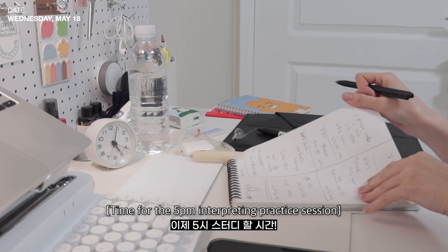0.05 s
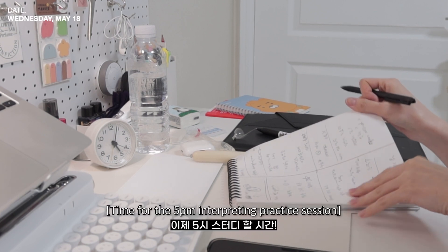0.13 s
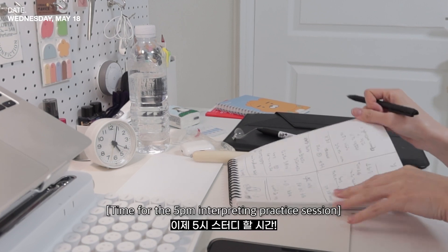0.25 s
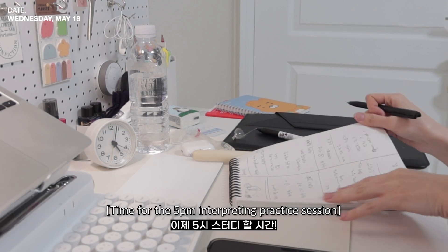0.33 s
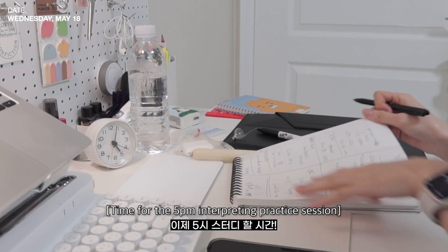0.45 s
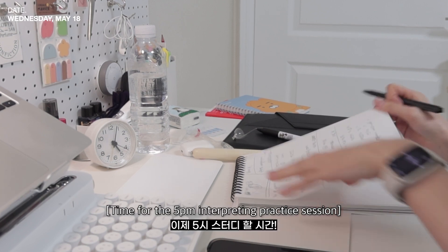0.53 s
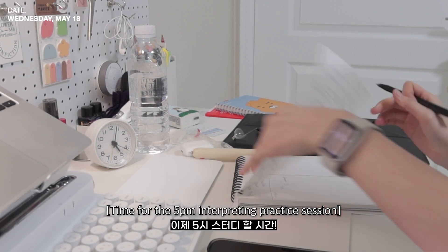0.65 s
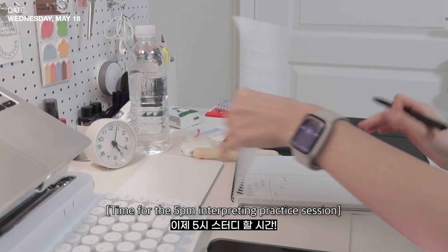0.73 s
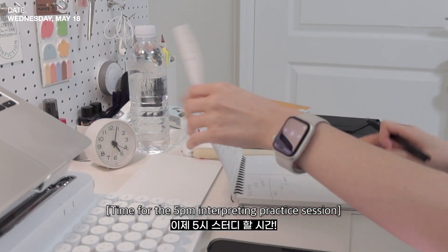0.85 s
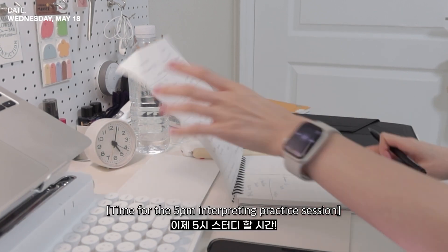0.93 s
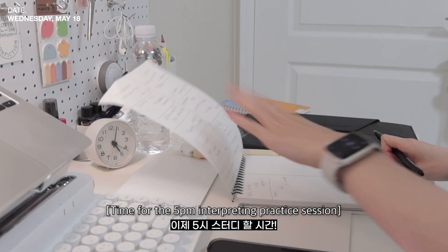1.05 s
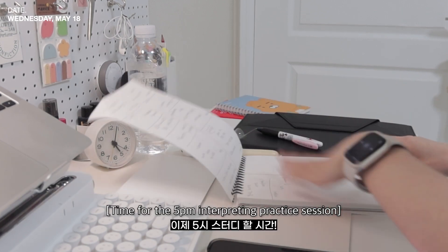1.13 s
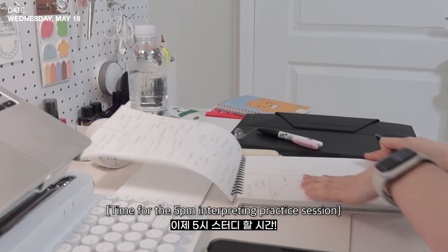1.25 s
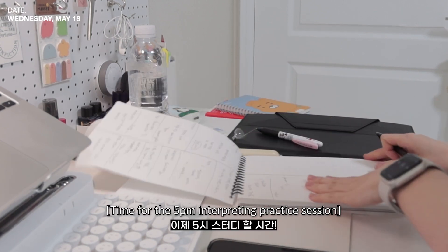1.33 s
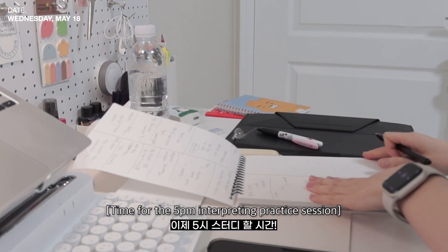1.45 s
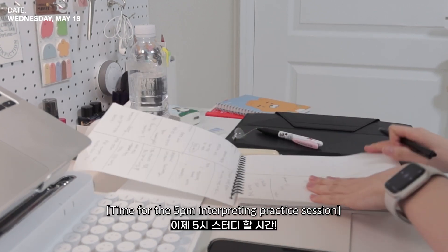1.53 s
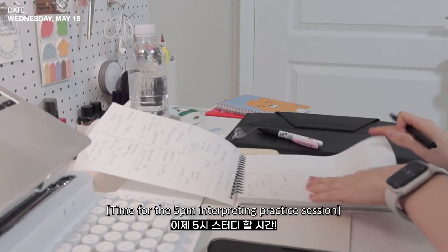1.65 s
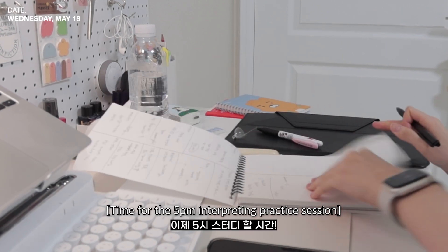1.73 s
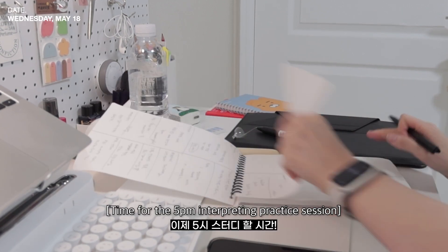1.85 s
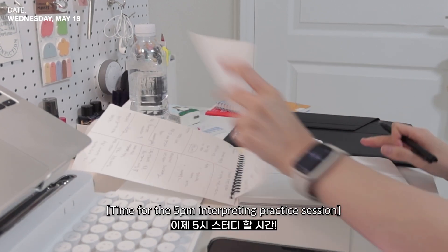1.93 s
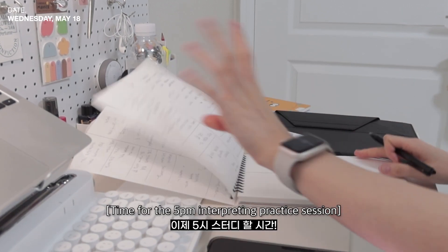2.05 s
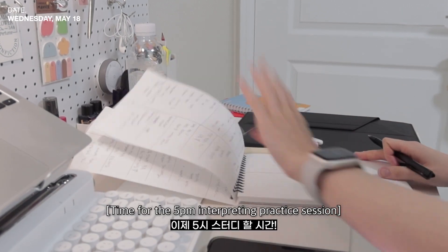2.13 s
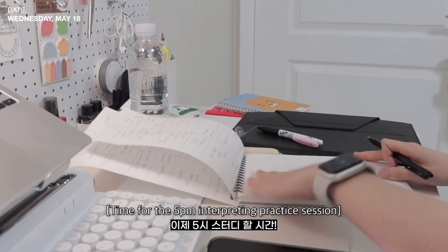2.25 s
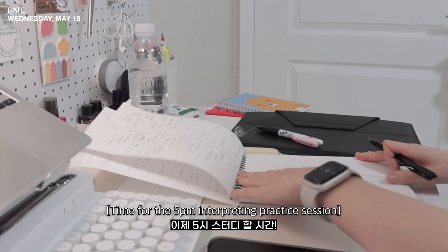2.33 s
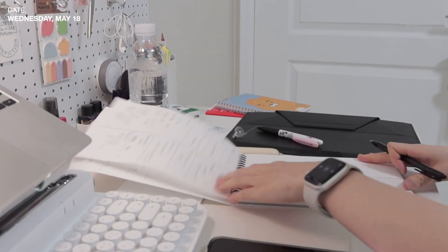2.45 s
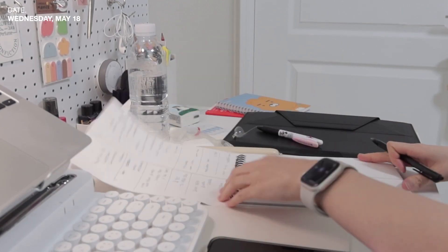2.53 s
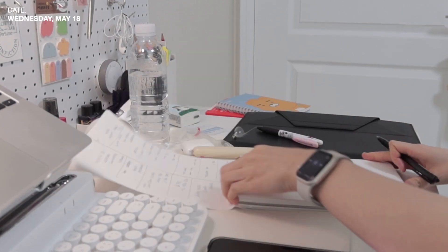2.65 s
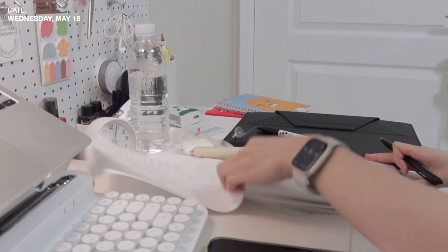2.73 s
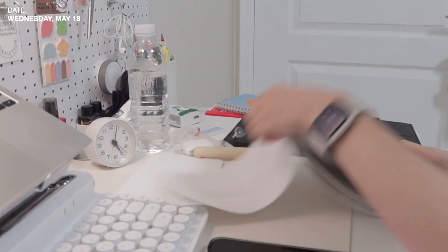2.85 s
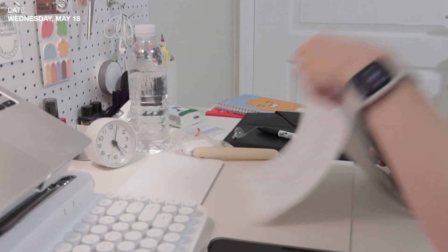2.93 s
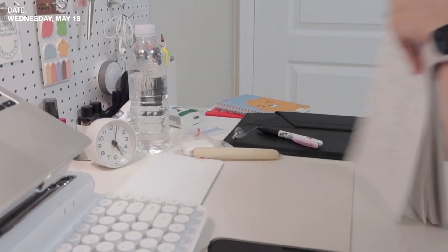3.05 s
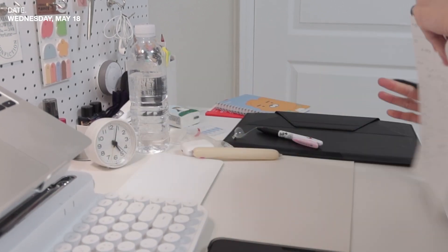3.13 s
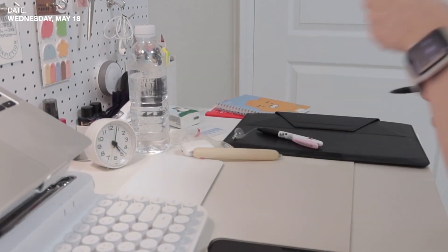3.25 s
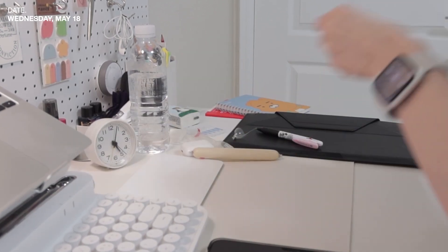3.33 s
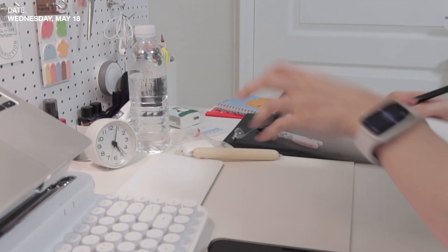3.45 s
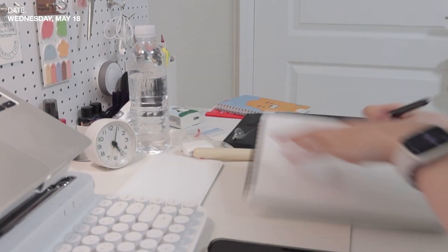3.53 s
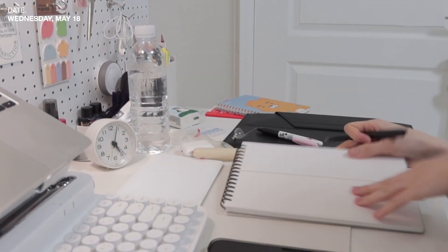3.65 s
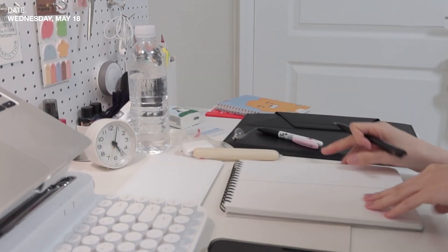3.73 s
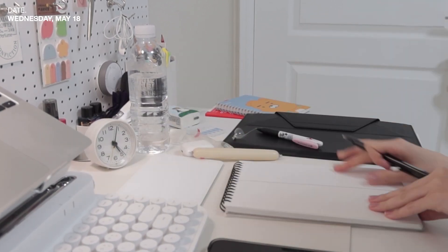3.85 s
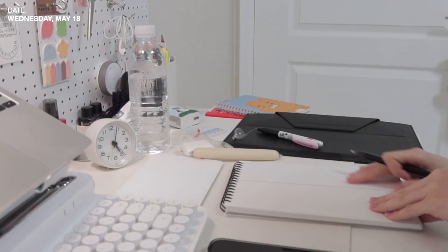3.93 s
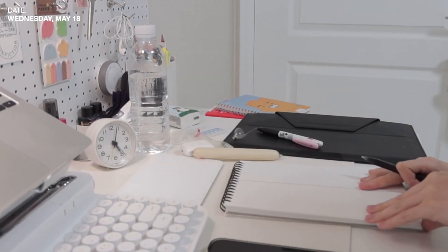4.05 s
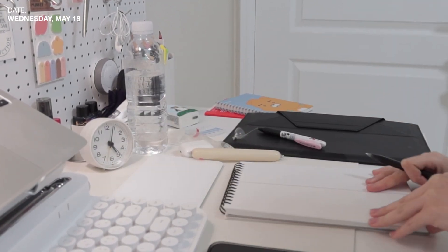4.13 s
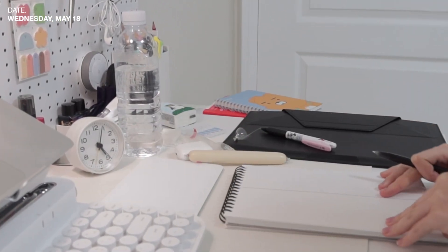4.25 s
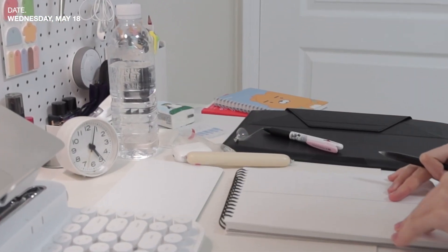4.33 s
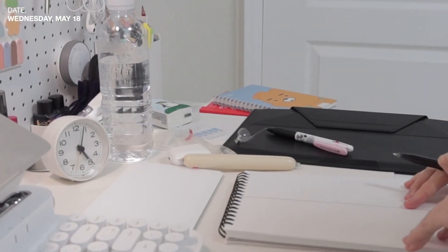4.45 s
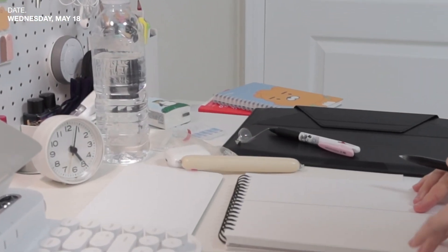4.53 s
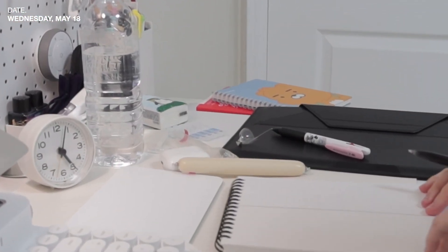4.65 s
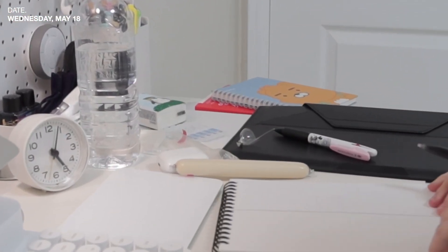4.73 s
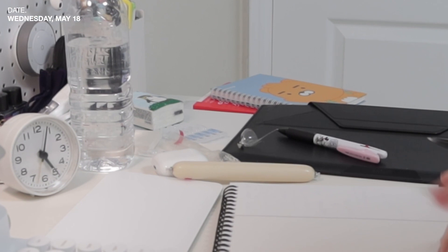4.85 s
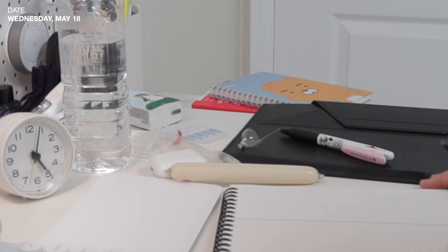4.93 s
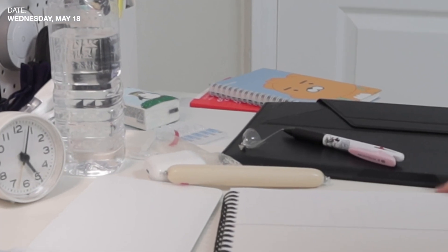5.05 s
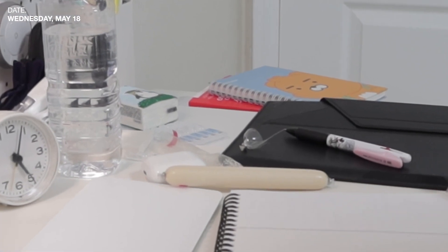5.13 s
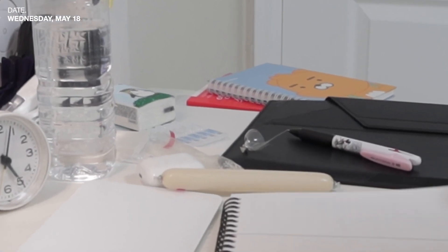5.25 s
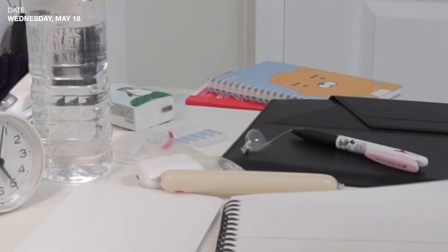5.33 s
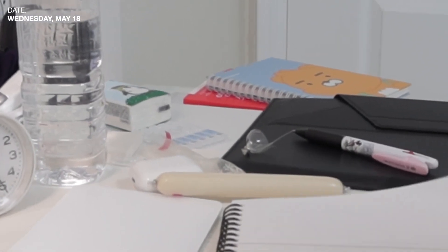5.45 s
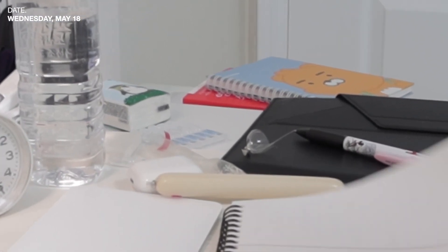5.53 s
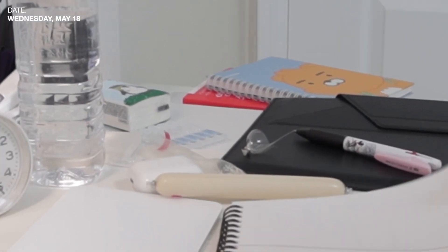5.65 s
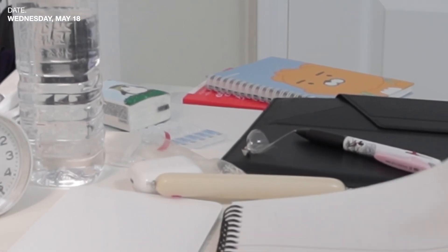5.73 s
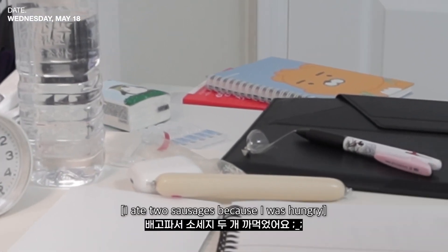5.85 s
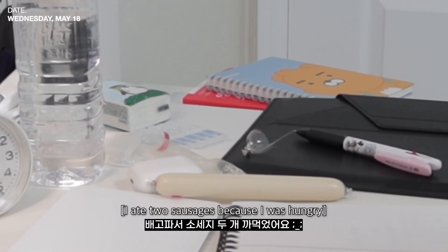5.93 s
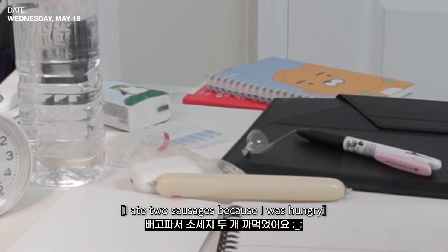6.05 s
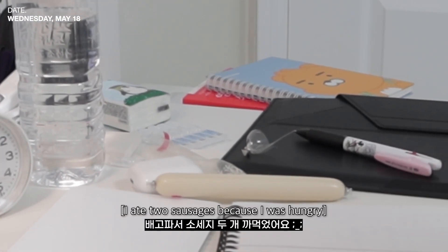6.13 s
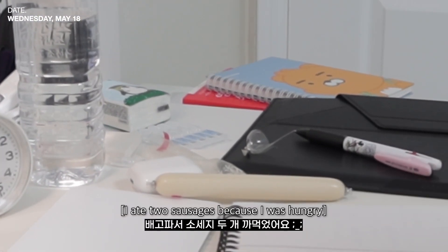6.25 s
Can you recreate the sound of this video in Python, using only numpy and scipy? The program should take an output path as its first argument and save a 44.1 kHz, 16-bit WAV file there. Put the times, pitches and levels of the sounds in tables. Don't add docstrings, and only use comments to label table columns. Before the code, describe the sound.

Close-miked paper on a desk indoors. Soft finger slides and small ticks come first, then a page flap, a quiet pause, and a much louder crisp crack. Busy rustling and wire ticks follow until about three seconds. The notebook lands with a single solid knock and low boom, followed by sparse creaks, gentle brushing and faint rustle over steady room hiss and low hum.

```python
import sys
import numpy as np
from scipy import signal
from scipy.fft import rfft, irfft, next_fast_len
from scipy.io import wavfile
from scipy.ndimage import uniform_filter1d, map_coordinates

SR = 44100
rng = np.random.default_rng(int(sys.argv[2]) if len(sys.argv) > 2 else 0)


def digitize_waveform(pressure):
    field = np.atleast_2d(pressure).T
    bounded = np.clip(field, -1, 1)
    quanta = np.round(bounded * 32767).astype(np.int16)
    wavfile.write(sys.argv[1], SR, quanta)


def undo_db(level):
    steps = np.asarray(level, float) / 20
    return 10 ** steps


N = 277429
TIME = np.arange(N) / SR


def unit(x):
    return x / np.sqrt(np.mean(x ** 2) + 1e-20)


def peak(x):
    return x / np.abs(x).max()


def along(points, hz):
    f, v = np.transpose(points)
    return np.interp(np.log(hz + 1), np.log(f + 1), v)


def wobble(rate):
    knots = rng.standard_normal(int(N * rate / SR) + 4)
    return map_coordinates(knots, [TIME * rate])


def coloured(x, spectrum):
    m = next_fast_len(len(x) + 8192)
    gain = undo_db(along(spectrum, np.fft.rfftfreq(m, 1 / SR)))
    return unit(irfft(rfft(x, m) * gain, m)[:len(x)])


def patchy(depth_db):
    z = signal.stft(rng.standard_normal(N), nperseg=256)[2]
    field = uniform_filter1d(rng.standard_normal(z.shape), 5, 0)
    field = unit(uniform_filter1d(field, 9, 1))
    return unit(signal.istft(z * undo_db(depth_db * field), nperseg=256)[1][:N])


def ringing(hz, db, q, size, strike=0):
    sheet = signal.iirpeak(hz, q + 0.034 * max(-25 - db, 0), SR)
    push = rng.standard_normal(size)
    push[0] += strike * np.sqrt(SR / hz)
    return unit(signal.lfilter(*sheet, signal.lfilter(*sheet, push)))


# (frequency [Hz], level [dB per Hz])
AIR_SPECTRUM = [(13, -50.5), (22, 5.5), (70, 0.5), (124, 4.5), (203, 0), (451, -10.5), (517, 3), (593, -24),
                (739, -6), (1510, -13.5), (1780, -24.5), (5630, -21), (7410, -16.5), (15600, -22.5)]


def background():
    phase = 2 * np.pi * np.cumsum(119.5 + 1.6 * wobble(8)) / SR
    hum = undo_db(-52.5 + 2.8 * wobble(7)) * np.sin(phase)
    hiss = undo_db(-52 + 0.28 * wobble(4.4)) * coloured(patchy(1.2), AIR_SPECTRUM)
    return hiss + hum


def grains(rate, spread_db, clump_db, life):
    chance, size = rng.random(N), rng.standard_normal(N)
    kicks = (chance < rate / SR) * undo_db(spread_db * size + clump_db * wobble(40))
    puffs = signal.lfilter([1], [1, -np.exp(-1 / (life * SR))], kicks)
    return unit(puffs * rng.standard_normal(N))


def gestures(rows, release_db_per_s, rest_db, second_rest_db):
    s, hold_ms, db, rise_ms, second_db = np.transpose(rows)[..., None]
    t = TIME[::32]
    early = np.maximum(s - t, 0) * 1000 / np.maximum(rise_ms, 2)
    late = np.maximum(t - s - hold_ms / 1000, 0)
    shape = db - 10 * early ** 1.1 - release_db_per_s * late

    def total(levels, floor_db):
        power = undo_db(2 * levels).sum(axis=0) + undo_db(2 * floor_db)
        return np.interp(TIME, t, 10 * np.log10(power))

    return total(shape, rest_db), total(shape + second_db, second_rest_db)


def rough(depth_db, crackle):
    return unit(patchy(depth_db) + crackle)


# (frequency [Hz], level [dB per Hz])
SLIDE_SPECTRUM = [(710, -30), (1200, -19), (1720, -2), (3470, 1), (4260, 2), (4850, 1.5), (7700, 5),
                  (9300, -2.5), (12100, -28), (20500, -120)]
# (frequency [Hz], level [dB per Hz])
PALM_SPECTRUM = [(800, -26), (1850, -7.5), (2500, -12), (4200, -6), (6000, -6), (7500, -2.5), (8600, -6),
                 (9600, -14), (11500, -56)]
# (frequency [Hz], level [dB per Hz])
FIZZ_SPECTRUM = [(8800, -35), (9900, -6), (10700, -5), (12000, -7.5), (13000, -11), (15600, -17)]


def hands(slide_db, fizz_db, palm_db, palm_fizz_db, crackles):
    grip = .9 * wobble(45)
    slide = undo_db(slide_db - 1.5 + grip) * coloured(rough(1.8, .22 * crackles), SLIDE_SPECTRUM)
    palm = undo_db(palm_db - 1.5 + grip) * coloured(rough(1.5, .2 * crackles), PALM_SPECTRUM)
    fizz_gain = undo_db(fizz_db + .6 + grip) + undo_db(palm_fizz_db + .6)
    fizz = fizz_gain * coloured(rough(2.2, .25 * crackles), FIZZ_SPECTRUM)
    return slide + palm + fizz


# (frequency [Hz], level [dB per Hz])
SHEET_SPECTRUM = [(350, -16.5), (600, -10.5), (680, -3), (1070, -4.5), (1700, -3.5), (3300, -9.5),
                  (5500, -24), (7800, -42), (13200, -120)]
# (frequency [Hz], level [dB per Hz])
FLAP_SPECTRUM = [(120, -48), (250, -5.5), (500, -1), (800, -8), (1500, -82)]


def leaf(sheet_db, flap_db, crackles):
    rattle = 1.5 * wobble(60)
    sheet = undo_db(sheet_db - 2.5 + rattle) * coloured(rough(2.5, .45 * crackles), SHEET_SPECTRUM)
    flap = undo_db(flap_db - 4.0 + rattle) * coloured(rough(2.64, .19 * crackles), FLAP_SPECTRUM)
    return sheet + flap


# (time [s], hold [ms], pressure [dB], rise over the last 10 dB [ms], fizz [dB re pressure])
TURNING_STROKES = [(.002, 50, -42, 50, -21), (.075, 12, -35, 87, -16.5), (.12, 42, -39, 53, -17),
                   (.21, 18, -33.5, 13, -13.5), (.371, 20, -36.5, 104, -13), (.668, 11, -35, 224, -13.5),
                   (.744, 86, -40.5, 60, -13), (.87, 48, -41, 30, -13), (.96, 35, -46.5, 30, -16),
                   (1.3, 147, -49.5, 32.5, -11), (1.59, 37, -28.5, 6, -18), (1.72, 94, -29, 44, -10),
                   (1.836, 3, -18.5, 10.5, -34), (.492, 18, -44, 11, -8), (1.921, 18, -21, 7, -7.5),
                   (2.12, 4.1, -33, 197, -16), (2.355, 140, -44, 4, -9.5), (2.525, 160, -34.5, 36, -14),
                   (2.742, 238, -25.5, 14, -12.5), (3.045, 17, -27.5, 0, -13.5), (3.11, 18, -38, 30, -9.5)]
# (time [s], hold [ms], pressure [dB], rise [ms], fizz [dB re pressure])
SMOOTHING_STROKES = [(3.32, 61, -47, 47, -7.5), (3.397, 4, -39.5, 49, -8), (3.52, 54, -44, 120, -7),
                     (3.655, 17, -33.5, 2.6, -9), (3.709, 130, -41, 39, -8.5), (3.955, 155, -48, 17, -3.5),
                     (4.799, 53, -49, 116, -11), (4.999, 22, -46.5, 110, -5), (5.282, 45, -49, 7, -11),
                     (5.33, 52, -44.5, 10, -11.5), (5.38, 100, -35, 19, -13), (5.515, 31, -32.5, 56, -12),
                     (5.57, 11, -35.5, 30, -18), (5.66, 460, -44, 18, -13), (5.955, 38, -39.5, 7.4, -11),
                     (5.68, 12, -36.5, 26, -17), (5.727, 7, -36.5, 19, -13), (5.897, 12, -37, 46, -13),
                     (6.115, 44, -39.5, 16, -8.5), (6.22, 87, -56, 50, -6)]
# (time [s], hold [ms], rattle [dB], rise [ms], flap [dB
BENDS = [(.078, 28, -35.5, 210, -9.5), (.21, 5, -34.5, 12, -12), (.371, 5, -36, 61, -5),
         (.47, 190, -49.5, 37, -2.5), (.688, 41, -34, 29, -9.5), (.737, 6.5, -24.5, 20, -5.5),
         (.8, 75, -38, 20, -3), (.9, 98, -38, 28, -11), (1.04, 27, -53, 12, 16),
         (1.459, 4.3, -36.5, 106, -4.5), (1.6, 40, -48, 24, -17), (1.729, 4, -39, 36, -23),
         (1.836, 3.5, -24.5, 5.2, -5), (1.9, 62, -29, 40, -7.5), (2.05, 39, -27.5, 52, -10),
         (2.152, 19, -22, 14, -13.5), (2.2, 12, -30, 57, -13), (2.355, 5.4, -38, 17, -5),
         (2.47, 34, -38.5, 69, -6), (2.527, 136, -25, 7.1, -10), (2.742, 7, -30, 7.4, -5.5),
         (2.97, 4.5, -28, 190, -17.5), (3.047, 105, -38.5, 15, -23),
         (3.328, 86, -48, 210, -6), (3.55, 6, -48, 120, -3), (3.656, 6.7, -32.5, 4.8, 3),
                  (3.7, 34, -38.5, 43, 1), (3.8, 68, -38.5, 36, -14), (4.112, 39, -47, 150, -12),
                  (4.346, 110, -54, 240, 1), (4.799, 25, -49, 150, -1.5), (5.264, 71, -70, 190, -1),
                  (5.45, 220, -45.5, 170, -6.5), (5.727, 5, -41, 53, -23), (5.841, 13, -41, 100, -12),
                  (5.91, 410, -50, 30, -17)]


def paper():
    rest_slide_db, rest_fizz_db = -64.5, -95
    slide_db, fizz_db = gestures(TURNING_STROKES, 221, rest_slide_db, rest_fizz_db)
    palm_db, palm_fizz_db = gestures(SMOOTHING_STROKES, 245, rest_slide_db, rest_fizz_db)
    sheet_db, flap_db = gestures(BENDS, 211, -57, -53.5)
    busy = np.clip((np.maximum(sheet_db, slide_db) + 54) / 14, .1, 1.3)
    crackles = busy * grains(rate=600, spread_db=2.5, clump_db=7.5, life=0.00077)
    return hands(slide_db, fizz_db, palm_db, palm_fizz_db, crackles) + leaf(sheet_db, flap_db, crackles)


# (frequency [Hz], level [dB per Hz])
CRACK_SPECTRUM = [(500, -22), (1500, 11), (4000, 10.5), (7700, 8.5), (9500, 0.5), (12000, -8.5),
                  (16000, -23)]
# (time [s], peak [dB], sheet resonance [Hz])
CREASES = [(0.367, -19.5, 4150), (1.296, -21.5, 1430), (1.358, -16, 1220), (1.4186, -15.5, 2170),
           (1.602, -18, 4500), (1.92, -7.5, 1760), (1.937, -2, 8100), (1.946, 1, 1850), (2.035, -8.5, 3600),
           (2.118, -7.5, 1940), (2.74, -8, 940), (2.86, -7.5, 7360), (3.518, -19.5, 7600),
           (3.803, -23.5, 762), (3.83, -19.5, 880), (3.854, -24.5, 725), (4.844, -24, 1420),
           (5.046, -38, 1360), (5.863, -21, 830)]
# (time [s], peak [dB], sheet resonance [Hz])
BUCKLES = [(.109, -13.5, 4610), (0.133, -20, 1530), (0.205, -20, 1690), (.732, -10, 1020),
           (1.264, -19, 1350), (1.3413, -13.5, 2300), (1.385, -21, 990), (1.833, 4, 4400), (1.84, 1, 3500),
           (1.846, 0, 1790), (1.851, -25, 1810), (1.9265, 3, 1810), (1.9318, 4.5, 1940), (2.658, -5, 1550),
           (3.555, -19.5, 7560), (3.65, -18, 829), (3.662, -11, 730), (3.784, -14, 7000), (3.891, -22, 856),
           (4.694, -39, 790)]
# (time [s], peak [dB], sheet resonance [Hz])
DENTS = [(.325, -12.5, 1500), (.736, -12, 1830), (1.035, -21, 950), (1.44, -13.5, 1370), (1.465, -18, 1810),
         (1.485, -19, 1530), (1.954, -7, 1700), (2.522, -13, 1940), (2.531, -13, 1770), (2.603, -5.5, 2330),
         (2.083, -10, 2600), (.6865, -10, 1720), (2.719, -9, 6940), (3.041, -8, 3800), (3.11, -13, 1710),
         (3.125, -6, 1450), (3.324, -25.5, 600), (3.687, -14, 2400), (4.026, -19, 8100), (4.139, -32, 2200),
         (4.341, -19, 2460), (4.863, -22.5, 2270), (5.17, -33, 2090), (5.242, -37, 620), (5.254, -25, 1130),
         (5.85, -22, 2270)]
# (time [s], peak [dB], sheet resonance [Hz])
TICKS = [(0.276, -25, 1800), (.422, -28, 2000), (0.463, -30, 1200), (.491, -23, 7000), (1.72, -11, 4200),
         (1.858, -11, 9000), (2.208, -19, 3600), (2.293, -30, 5000), (2.339, -23.5, 7500),
         (2.352, -13, 3530), (2.362, -25, 3300), (2.374, -15, 2440), (2.377, -12.5, 6030),
         (2.424, -9.5, 2870), (2.452, -6.5, 3400), (2.501, -16.5, 3300), (2.519, -5, 3320),
         (2.53, -2, 3400), (2.561, -10, 6500), (2.655, -8.5, 3300), (2.738, -5.5, 1200), (2.851, -2, 4500),
         (2.857, -1.5, 4470), (2.921, -15.5, 3100), (2.93, -8.5, 4200), (2.941, -28, 3500),
         (3.123, -7.5, 4180), (3.556, -41, 3830), (3.587, -25, 4200), (4.694, -39, 6200),
         (3.005, -19, 4500), (2.61, -10, 8100), (2.613, -13, 5200), (6.061, -30, 804), (1.366, -28, 3500),
         (1.39, -29, 3500), (1.401, -34, 3300), (1.429, -20, 2300), (1.475, -24, 1300), (0.739, -12, 1480),
         (.36, -22, 11000), (0.541, -28, 900), (5.889, -29, 1600), (5.269, -49, 2200), (5.61, -22, 1500),
         (5.668, -26, 1500), (5.714, -23, 3500), (5.995, -22.5, 2000)]


def snaps():
    out, t = np.zeros(N + SR), np.arange(SR // 8) / SR
    bright = coloured(rng.standard_normal(N + SR), CRACK_SPECTRUM)
    rise = 1 - np.exp(-t / .0001)
    # (events, crack [dB], t60 [s], first blow over the noise that follows)
    kinds = [(CREASES, 0, 0.02, 1.5), (BUCKLES, -10.5, 0.017, 1.5),
             (DENTS, -22, 0.016, .8), (TICKS, -6, 0.0095, 6)]
    for rows, crack_db, t60, strike in kinds:
        for s, db, hz in rows:
            at = round(s * SR)
            crack = peak(rise * bright[at:at + len(t)] * undo_db(-60 * t / (0.62 * t60)))
            body = peak(ringing(hz, db, 2.1, size=len(t), strike=strike) * undo_db(-60 * t / t60))
            out[at:at + len(t)] += undo_db(db - 8.5) * (body + undo_db(crack_db + 9) * crack)
    return out[:N]


def ring(modes, damp, t):
    out = np.zeros(len(t))
    for hz, db, t60 in modes:
        decay_db = -60 * t / min(damp * t60, .7)
        out += undo_db(db + rng.normal(0, 1) + decay_db) * np.sin(2 * np.pi * hz * t)
    return out


# (frequency [Hz], level [dB], t60 [s])
DESK_MODES = [(347, 8, 0.29), (414, -9.5, 0.13), (458, -24, 0.26), (670, 7, 0.38), (731, 6, 0.35),
              (753, -27, 0.52), (890, -22, 0.2), (1130, 1, 0.2)]
# (frequency [Hz], level [dB], t60 [s])
FRAME_MODES = [(83, 7, 0.25), (123, 8.5, 0.36), (148, 4, 0.2), (178.8, 6, 0.3), (244.4, -1.5, 0.13)]
# (time [s], peak [dB], boom [dB re peak])
BUMPS = [(0.29, -49, 0), (0.734, -22, -22), (1.291, -38, -12), (1.343, -27, -31), (1.833, -21, -31),
         (1.849, -49, -25), (2.354, -36.5, -2), (2.374, -29, -8), (2.619, -19, -39), (3.652, -51, -21),
         (3.662, -5, -13.5), (3.666, -25.5, 0.5), (3.675, -27, 2), (3.757, -39.5, 5.5), (3.827, -25, -11),
         (3.892, -35, -2.5), (3.999, -39, -17), (4.69, -46.5, 2), (4.842, -31.5, -24), (5.243, -36, -32),
         (5.879, -40.5, -2), (6.061, -36.5, -16)]


def desk():
    out, t = np.zeros(N + SR), np.arange(SR // 3) / SR
    for s, db, boom_db in BUMPS:
        knock = ring(DESK_MODES, 0.13, t) * (1 - np.exp(-t / 0.0045))
        boom = undo_db(boom_db + 7.0) * ring(FRAME_MODES, 0.55, t) * (1 - np.exp(-t / 0.0082))
        out[round(s * SR):][:len(t)] += undo_db(db - 8.0) * (knock + boom)
    return out[:N]


# (frequency [Hz], level [dB], t60 [s])
LEG_MODES = [(47.6, -1, 1), (57.2, -7, 1)]
# (time [s], peak [dB])
SWAYS = [
    (.295, -45),
    (2.36, -50),
    (3.66, -26),
    (4.85, -51),
    (6.04, -52),
]


def legs():
    out, t = np.zeros(N + SR), np.arange(SR) / SR
    sway = sum(undo_db(db - 60 * t / t60) * np.sin(2 * np.pi * hz * t) for hz, db, t60 in LEG_MODES)
    sway = sway * (1 - np.exp(-t / 0.0066))
    for s, db in SWAYS:
        out[round(s * SR):][:SR] += undo_db(db) * sway
    return out[:N]


def soft_bursts(rows, q):
    out, t = np.zeros(N), np.arange(-SR // 16, SR // 16) / SR
    for s, db, hz, half in rows:
        shape = np.exp(-(t / np.where(t < 0, .7 * half, 1.2 * half)) ** 2)
        burst = shape * ringing(hz, db, q, size=len(t))
        level = undo_db(db) * np.linalg.norm(shape) / np.linalg.norm(burst)
        out[round(s * SR) - SR // 16:][:len(t)] += level * burst
    return out


# (time [s], level [dB], resonance [Hz], half length [s])
FOLDS = [(1.05, -41, 500, 0.018), (1.075, -42.5, 1240, 0.021), (1.1, -47, 700, .015),
         (1.347, -35, 2420, 0.0096), (1.838, -14.5, 1820, 0.0076), (1.857, -17, 1870, 0.0046),
         (1.885, -28, 1700, 0.017), (2.7, -38, 7260, 0.018), (2.864, -28, 6200, 0.0034),
         (2.922, -27, 3100, 0.0032), (2.921, -31, 7000, .004), (3.113, -31.5, 1710, 0.0048),
         (3.13, -28, 1590, 0.0025), (3.522, -39.5, 1130, 0.0039), (.331, -33.5, 900, 0.0051),
         (3.388, -39, 2120, .012), (3.735, -38, 506, 0.028), (4.399, -43.5, 520, 0.0038),
         (5.51, -49, 1820, .03), (5.72, -44.5, 1840, 0.034), (5.63, -46.5, 6500, 0.02),
         (5.877, -41, 795, 0.0032)]


def folds():
    return soft_bursts(FOLDS, 2.2)


# (time [s], level [dB], resonance [Hz], half length [s])
CREAKS = [(.66, -39.5, 1680, .02), (1.236, -52, 3000, 0.0028), (4.32, -55, 2500, 0.03),
          (3.802, -32, 2600, 0.0034), (4.365, -47.5, 2400, 0.013), (4.352, -40.5, 3550, 0.0065),
          (4.9, -45, 4000, 0.0071), (4.345, -43.5, 830, 0.005), (4.447, -51.5, 2630, 0.0097),
          (4.445, -53, 3800, 0.0061), (4.5, -55, 4760, 0.0022), (4.155, -39.5, 3900, 0.0019),
          (4.878, -41, 2180, 0.0045), (4.887, -46, 2630, 0.0042), (5.742, -32.5, 3130, .004),
          (5.755, -45, 2300, 0.014), (3.406, -46, 1630, 0.02), (3.38, -44.5, 1020, 0.014)]


def creaks():
    return soft_bursts(CREAKS, 4.4)


# (time [s], level [dB], resonance [Hz], half length [s])
SWELLS = [(.694, -32, 1580, 0.014), (0.747, -28, 2960, 0.0066), (.845, -41, 1990, 0.014),
          (1.619, -37, 4670, 0.031), (2.607, -28, 6950, 0.014), (2.745, -25, 7000, 0.0081),
          (2.966, -29.5, 3060, 0.033), (0.747, -38, 1130, 0.014), (1.055, -43, 660, 0.016),
          (1.851, -11, 1870, 0.0054), (1.8514, -3, 4200, 0.0019), (2.036, -23.5, 3840, 0.0036),
          (2.075, -11.5, 2380, 0.0035), (2.147, -14, 1760, 0.0067), (2.18, -24, 850, 0.0076),
          (2.56, -19.5, 1960, 0.0088), (2.619, -20.5, 800, 0.0092), (2.644, -26, 1720, 0.023),
          (2.6562, -15, 10300, 0.00076), (2.89, -24.5, 2540, 0.011), (2.962, -29, 1180, 0.0057),
          (3.056, -21.5, 3640, 0.021), (3.072, -24.5, 3160, 0.0051), (3.278, -43, 730, 0.009),
          (3.377, -45, 2080, 0.022), (3.665, -22.5, 2840, 0.0038), (3.673, -18.5, 660, 0.0085),
          (3.701, -30, 324, 0.0069), (3.805, -35, 740, 0.0055), (3.894, -35.5, 407, 0.0085),
          (3.833, -24, 406, 0.0046), (5.74, -37.5, 2500, 0.0068), (.738, -22.5, 262, 0.0047),
          (1.84, -32.5, 198, .008), (2.8, -54, 218, 0.025), (1.37, -37, 890, 0.014),
          (1.95, -25, 1510, 0.0061), (5.884, -31, 1540, 0.0087), (5.885, -32.5, 646, 0.0034),
          (5.888, -31, 4080, 0.0038)]


def swells():
    return soft_bursts(SWELLS, 1.2)


# (frequency [Hz], t60 [s])
ROOM_DECAY = [(200, 0.54), (2000, 0.12), (10000, 0.082)]


def room(x):
    hz, t, z = signal.stft(rng.standard_normal(SR // 2), SR, nperseg=256)
    decay = undo_db(-60 * t / along(ROOM_DECAY, hz)[:, None])
    tail = signal.istft(z * decay, SR, nperseg=256)[1]
    return signal.fftconvolve(np.pad(x, (200, 0)), tail / np.linalg.norm(tail))[:N]


def scene():
    air = background()
    rustle = paper()
    bursts = snaps() + folds() + creaks() + swells()
    echo = room(undo_db(-11.0) * bursts + undo_db(-15.5) * rustle)
    return (air + rustle + bursts + desk() + legs() + echo)[None]


def roll_off(x):
    return signal.sosfilt(signal.butter(12, 15710, fs=SR, output="sos"), x)


def record(dry):
    heard = signal.lfilter(*signal.butter(N=2, Wn=32, btype="high", fs=SR), dry)
    heard = heard - 0.26 * signal.lfilter(*signal.iirpeak(9450, 9, SR), heard)
    top, hard = 1.02, 8
    clipped = heard / (1 + np.abs(heard / top) ** hard) ** (1 / hard)
    return roll_off(clipped)


dry = scene()
out = record(dry)
digitize_waveform(out)
```